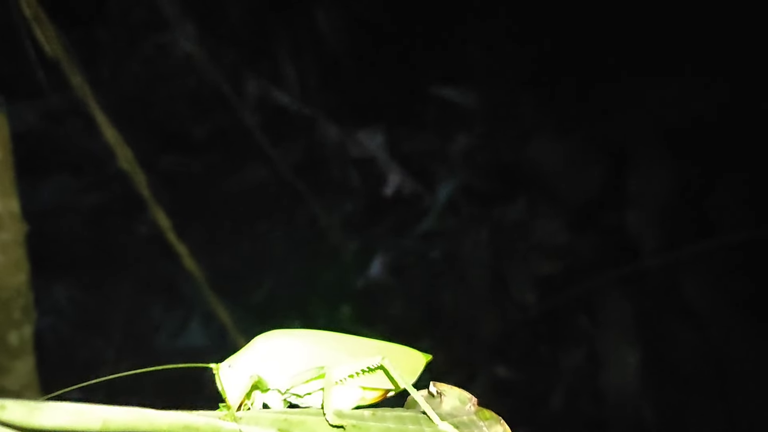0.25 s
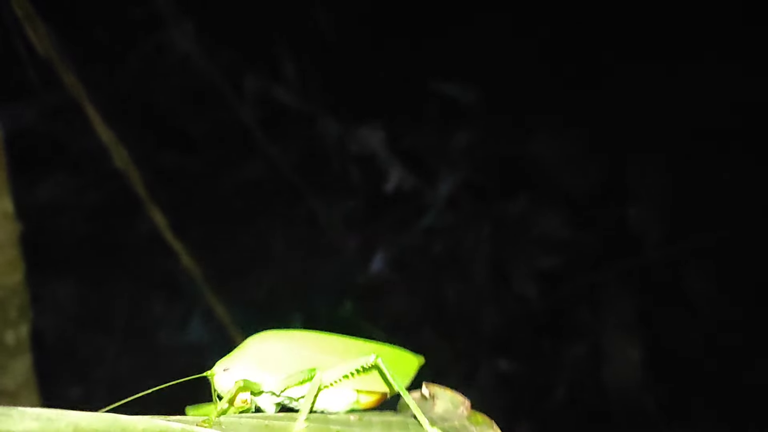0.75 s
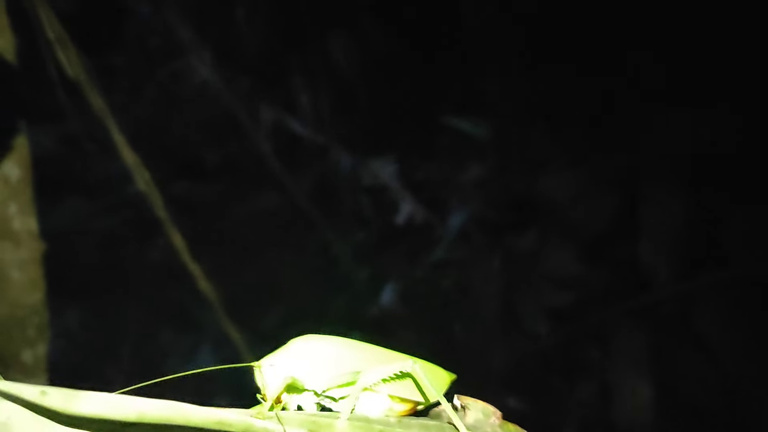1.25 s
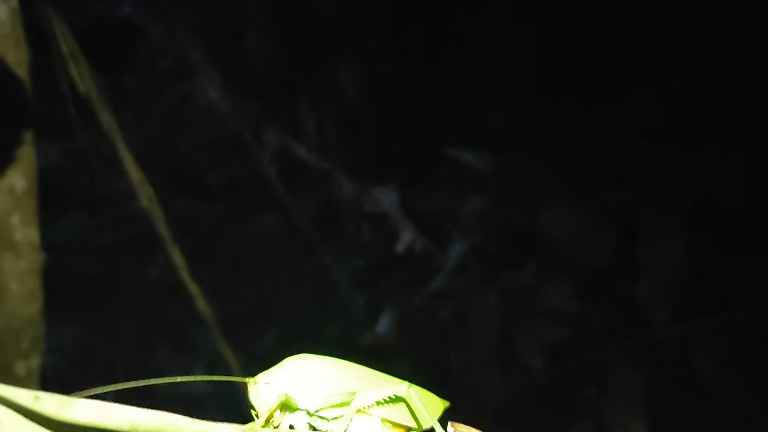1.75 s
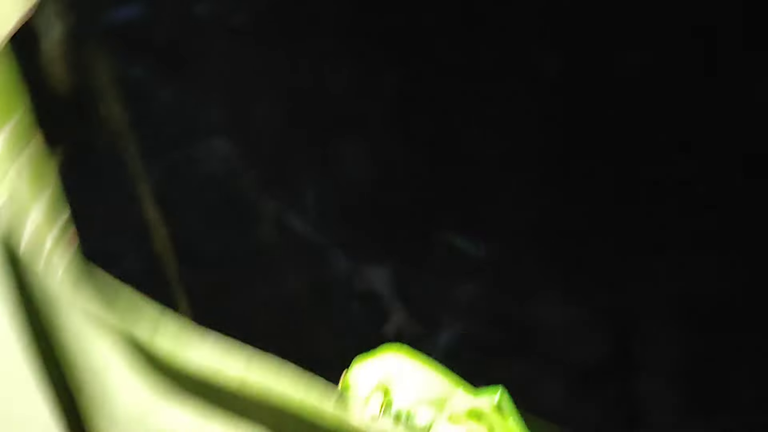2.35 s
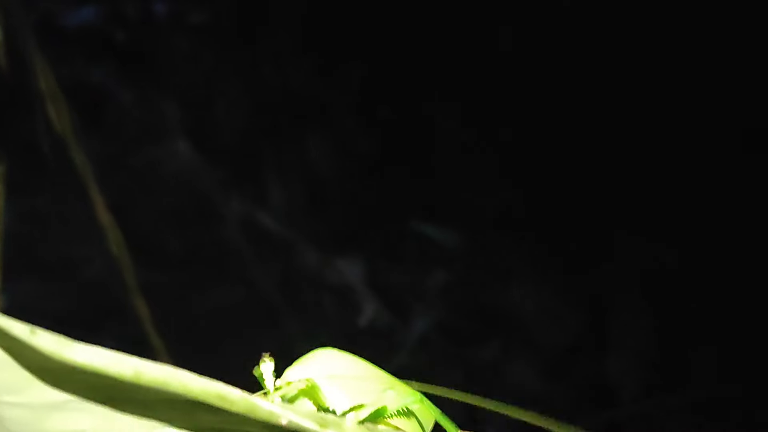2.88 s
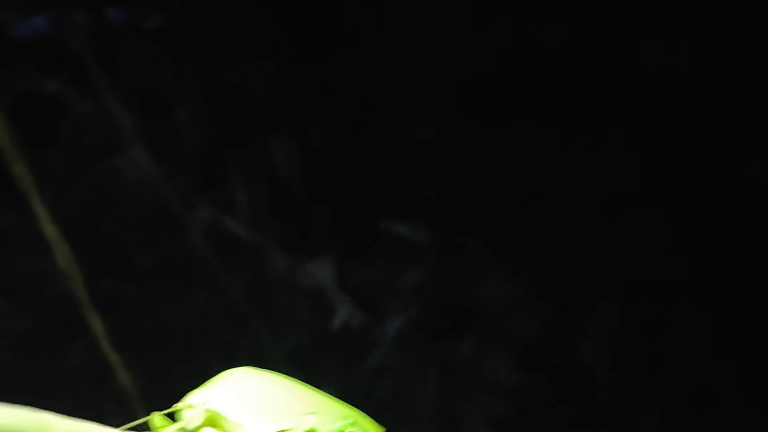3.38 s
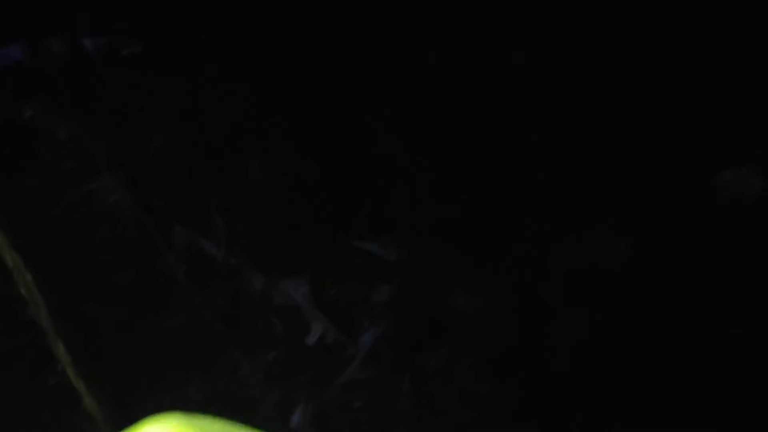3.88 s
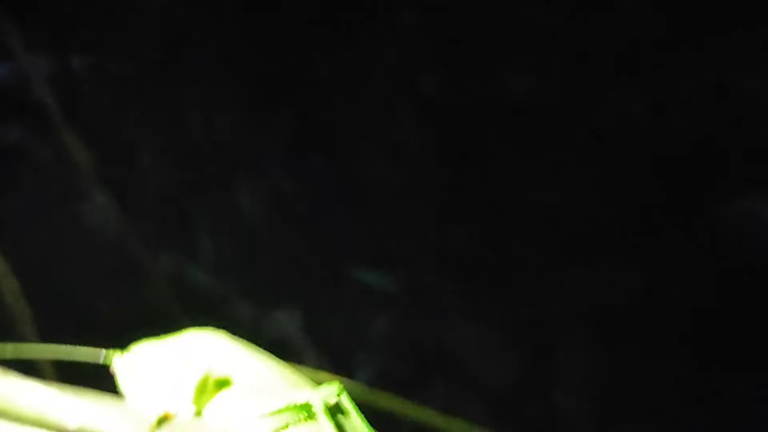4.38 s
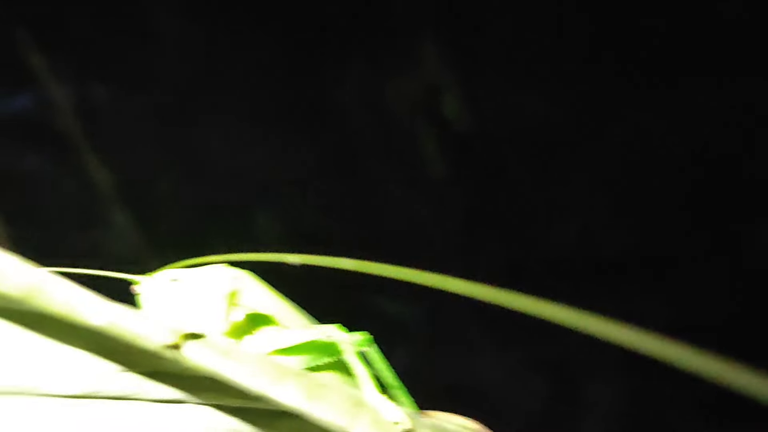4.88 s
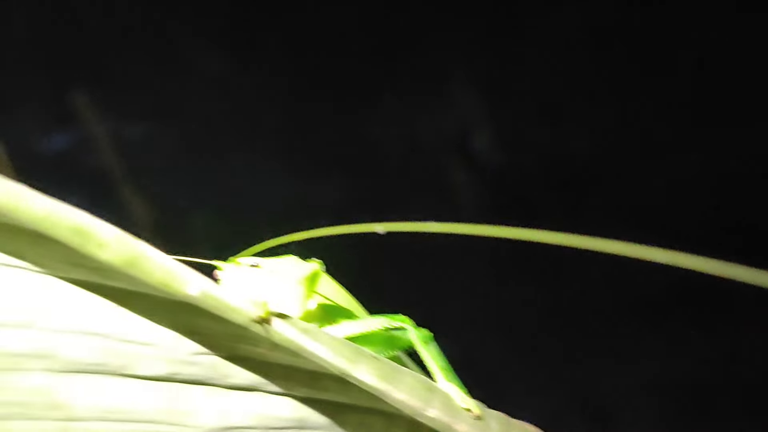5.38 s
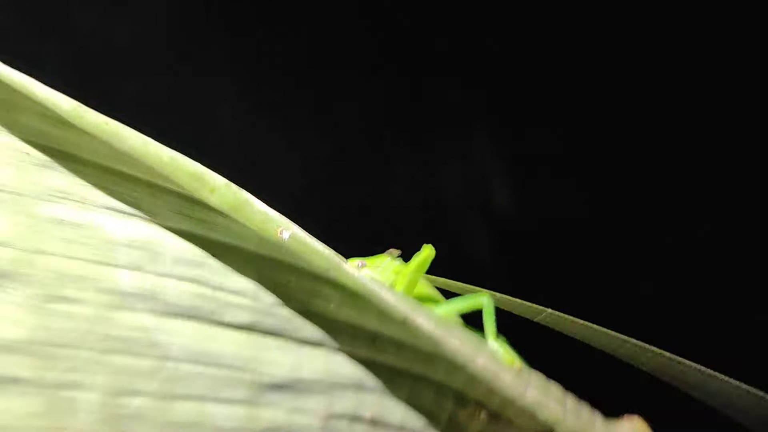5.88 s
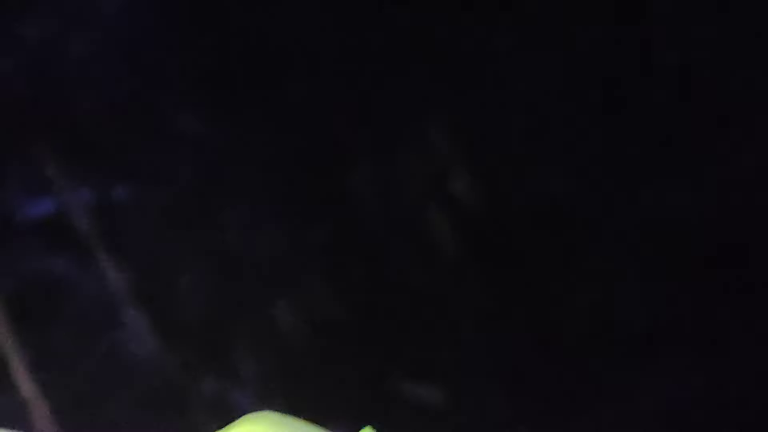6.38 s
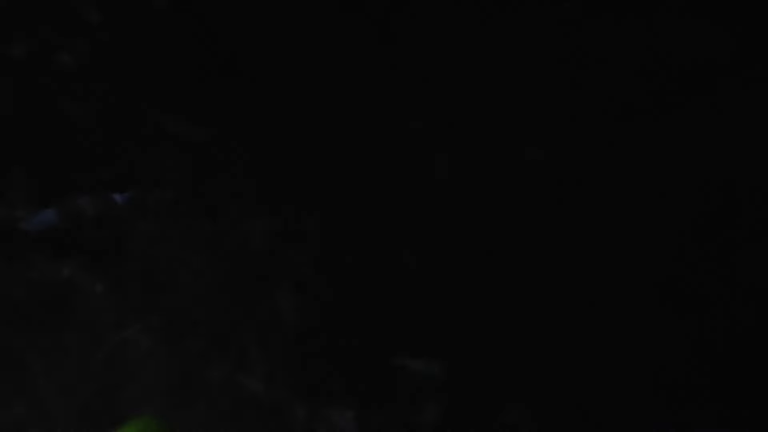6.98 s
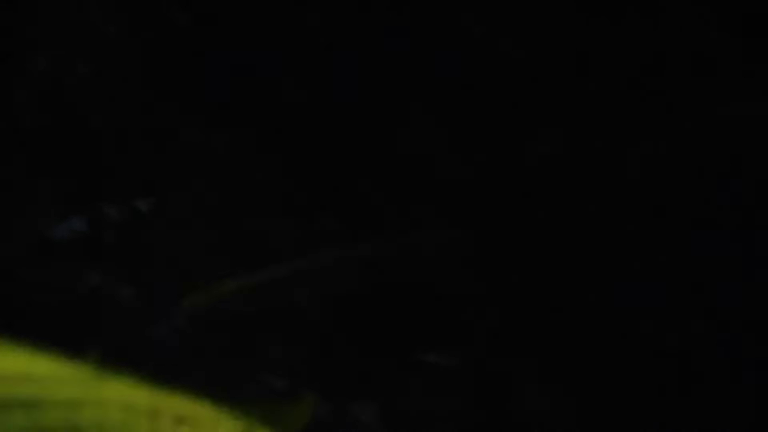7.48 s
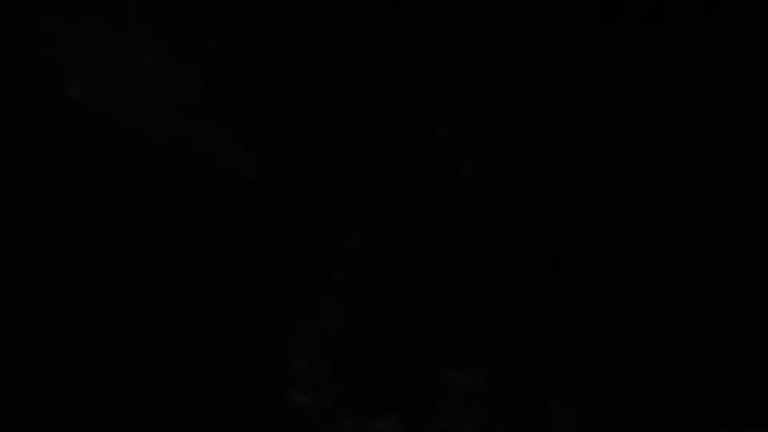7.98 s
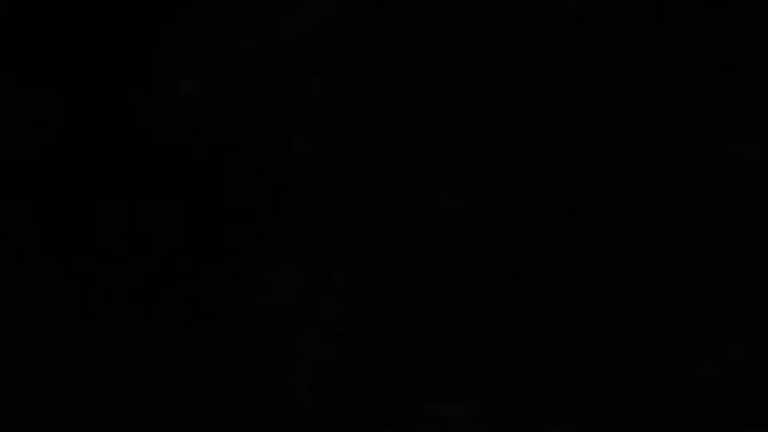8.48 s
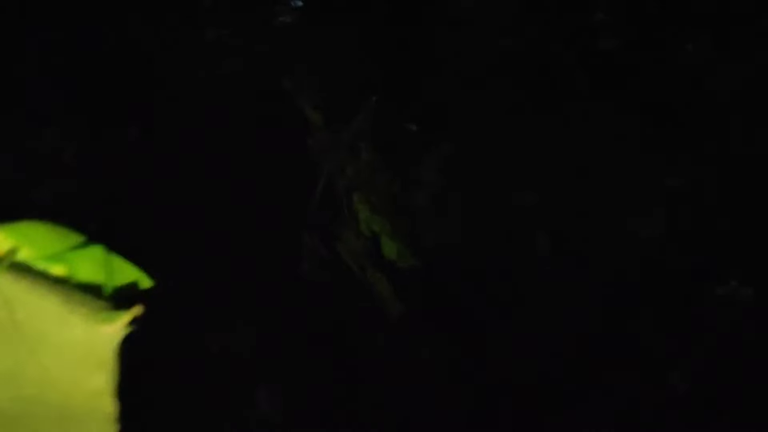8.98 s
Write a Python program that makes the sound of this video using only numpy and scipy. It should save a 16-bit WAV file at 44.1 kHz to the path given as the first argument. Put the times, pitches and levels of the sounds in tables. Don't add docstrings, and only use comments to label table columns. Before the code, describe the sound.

A night forest hisses with katydids and a cricket trills regularly, while a hand rubs and knocks the microphones and dry leaves snap.

```python
import sys
import numpy as np
from scipy import signal
from scipy.fft import rfft, irfft, next_fast_len
from scipy.io import wavfile
from scipy.ndimage import uniform_filter1d

SR = 44100
rng = np.random.default_rng(int(sys.argv[2]) if len(sys.argv) > 2 else 0)


def transcribe(u):
    v = np.clip(np.atleast_2d(u).T, -1, 1)
    q = np.round(v * 32767).astype(np.int16)
    wavfile.write(sys.argv[1], SR, q)


def boost_factor(decibels):
    exponent = np.asarray(decibels, float) / 20
    return 10 ** exponent


N = 407528
PORT_LAG_SAMPLES = 18

# freq_hz, density_db_per_hz
AIR_SPECTRUM = [(18, -40), (30, 1.5), (118, -1.5), (275, -6.5), (323, -9.5), (437, -11.5), (616, -12),
                (1020, -17.5), (1150, -19), (3700, -24.5), (4810, -69), (8140, -120)]
# freq_hz, density_db_per_hz
HISS_SPECTRUM = [(4710, -35.5), (8000, -9), (8610, -3.5), (9170, -6.5), (10200, -7.5), (10500, -6.5),
                 (12800, -5.5), (14500, -6), (15800, -9.5)]
AIR_DB, AIR_SWELL_DB, HISS_DB = -55.5, 1.2, -62.5
# freq_hz, left_minus_right_db
PORT_RESPONSE = [(60, 0), (700, 0.5), (2400, -1.5), (4400, -1), (7300, -6.5), (7800, -13), (9400, -21),
                 (10800, -9), (15000, 1)]

# first_wing_hz, last_wing_hz, wing_width_hz, level_db
SWARMS = [
    (4170, 5040, 380, -60.5),
    (6772, 7300, 160, -57.5),
    (7340, 6700, 19, -90),
    (6253, 4200, 93, -70),
]
# pitch_hz, width_hz, level_db
SINGERS = [(4380, 16, -67.5), (4490, 47, -66), (4597, 49, -62), (4920, 83, -61.5), (6710, 27, -69.5),
           (6920, 13, -68), (7230, 17, -61), (7090, 29, -60), (7870, 22, -67), (8406, 30, -73),
           (8060, 30, -78.5), (8550, 32, -76.5)]
# full_s, rise_s, hold_s, fall_s, level_db
BUZZ = [
    (2.95, 0.063, 0.56, 0.3, -53),
    (3.45, 0.54, 0.435, 0.15, -49.5),
]

# freq_hz, width_hz, gain_db
CRICKET_MODES = [(3430, 190, -1), (3190, 500, -5), (2650, 700, -26), (3690, 160, -7.5)]
# loudest_syllable_s, level_db, spacing_s, hold_s
TRILLS = [
    (0.012, -50.5, 0.062, 0.071),
    (1.73, -49, 0.058, 0.01),
    (3.429, -48.5, 0.061, 0.015),
    (5.146, -46, 0.058, 0.0047),
    (6.782, -45.5, .064, 0.055),
    (8.571, -47, 0.059, 0.07),
]
TRILL_SWELL_DB_PER_S, TRILL_FADE_DB_PER_S = 73, 184

# start_s, level_db, left_minus_right_db, body_over_tick_db
TICKS = [(0.3456, -46, -19, 8), (0.9747, -36, -21, -10), (1.044, -32, -23, -29), (1.0854, -38, -18.0, -19),
         (1.1074, -37, -19.0, -17), (1.1408, -35, -24, -17), (2.1398, -21, -40, -13),
         (2.141, -24.5, -40, -3), (2.1417, -25, -40, -8), (2.1442, -22, -40, -10), (2.1625, -39, -21, -2),
         (2.2297, -37.5, 6, 11), (2.4904, -31, 4, 9.5), (3.0716, -23.5, -22, -7), (3.376, -27, -18, -3),
         (3.7504, -26, -20, -11), (3.784, -19, -30, -0.5), (3.7853, -23, -34, -9), (3.7922, -17.5, -34, -3),
         (4.0482, -40.5, -30, 5.5), (4.065, -26.5, -35, -5), (4.4183, -24, -27, -11),
         (4.4293, -12.5, -23, -12), (4.4306, -11.5, -24, -19), (4.4317, -12, -23, -12),
         (4.432, -22, -19, -12), (4.436, -33, -23, -15), (4.4578, -18.5, -22, -9), (4.4595, -27, -20, -11),
         (4.835, -42, -23, -4), (4.9217, -48, -24.0, -14), (4.9452, -39, -24.0, -16),
         (5.7012, -30, -22, -4.5), (6.2451, -34, -17.0, -17), (7.4478, -46, 7, 14.5),
         (7.7358, -23, -5, -10), (7.7564, -33, 0, -5), (8.1715, -19, -30, -3), (8.1728, -15, -32, -4),
         (8.1795, -28, -25, -5), (8.9204, -39, -24, 3), (9.025, -34, -19, -1), (9.129, -40, -26, 9.5)]
# start_s, level_db, ring_hz, length_s, left_minus_right_db
SNAPS = [(2.283, -30.5, 1500, 0.0033, -6), (3.636, -35, 1200, 0.0041, 14), (4.429, -20, 6000, 0.0041, -8),
         (4.458, -32, 4200, 0.0033, 6), (4.615, -37, 840, .015, -8), (4.945, -35, 1500, .006, -14),
         (4.958, -33, 513, 0.008, -14), (8.17, -33, 770, 0.01, -11), (7.668, -26, 2400, 0.0078, 0),
         (7.684, -18, 2400, 0.0044, -7), (7.692, -20, 2200, 0.0094, 8), (7.686, -20, 990, 0.0061, 7),
         (7.697, -17, 930, 0.0062, 11), (7.711, -40, 2300, 0.0029, 4), (7.736, -30.5, 2100, 0.0074, -1),
         (7.757, -24.5, 5600, .005, 5)]

# full_s, rise_s, hold_s, fall_s, level_db
SWIPE = [
    (2.284, 0.002, 0.027, 0.044, -38.5),
    (2.32, 0.044, 0.041, 0.083, -33),
]
# freq_hz, width_hz, gain_db
SWIPE_BODY_MODES = [(1910, 280, -3), (2210, 120, -5), (2330, 78, 2), (2495, 92, -2), (3756, 81, 3),
                    (3870, 140, 1.5), (2790, 260, -5), (4680, 170, -10.5), (5080, 120, -10.5),
                    (5820, 93, -4.5), (6890, 80, -4.5)]
# freq_hz, width_hz, gain_db
SWIPE_TREBLE_MODES = [(9150, 200, 2), (9380, 220, 1), (9600, 500, -2), (10900, 440, -0.5),
                      (12050, 430, -2.5), (13400, 500, -13), (15030, 900, -21)]

# start_s, crack_db, thump_over_crack_db, thump_hz
KNOCKS = [(0.058, -47.5, 3.5, 192), (2.23, -29.5, 5, 148), (2.316, -30.5, -3, 92),
          (2.4902, -30.5, 9.5, 360), (2.492, -30, 11, 195), (2.499, -47, 24, 85), (2.503, -59, 14, 164),
          (2.517, -56, 16, 158), (2.868, -53.5, -3, 169), (2.915, -55, 8, 141), (2.972, -51, 9, 130),
          (3.099, -49, 5, 203), (3.147, -46, 10.5, 106), (3.179, -49, 7, 222), (6.65, -52, 11, 167),
          (6.789, -41, 5.5, 170), (7.448, -39, -6, 160), (2.543, -46, 14, 196), (2.617, -36.5, 3.5, 163),
          (2.72, -48.5, 0, 168), (2.761, -40, -2, 166), (2.932, -42, 0, 137), (3.343, -46, -2, 266),
          (3.372, -35, -1, 434), (3.402, -38, 8.5, 92.5), (3.473, -34, -2, 258), (3.535, -36.5, 1, 116),
          (3.552, -27.5, -5.5, 320), (3.626, -46.5, 16, 130), (3.634, -46, 7, 345), (3.77, -44, 4, 65),
          (4.431, -44.5, 13, 142), (4.945, -36, -5.5, 404), (5.921, -48, 0.5, 173), (6.377, -49.5, -1, 192),
          (6.812, -32.5, -4, 132), (7.42, -47, -8, 234), (7.677, -52, 2, 105), (7.778, -41, -7, 215),
          (8.151, -47, 0.5, 188), (8.781, -56.5, 9.5, 246)]
# start_s, crack_db, left_minus_right_db
TAPS = [(2.972, -53, 10), (2.995, -47, 8), (3.026, -42, 11), (3.071, -40.5, 15), (3.173, -48, 11),
        (3.656, -51, 24), (3.699, -45, -17), (3.72, -44, -30), (4.317, -52, -13), (4.457, -32, -5),
        (4.62, -45, -16), (6.964, -34, 7), (7.049, -38.5, 6), (7.148, -39.5, 8), (7.629, -55, 12),
        (7.669, -36, 15), (7.733, -37, 6), (7.806, -50, -7), (7.985, -42.5, 3.5), (8.03, -46, 6),
        (8.0663, -35, 11), (8.108, -54, 0), (8.391, -54, -10), (7.901, -63, 3), (6.621, -60, 4),
        (6.64, -58, -5), (6.675, -55, 10), (8.329, -48, 26)]

# time_s, palm_left_minus_right_db, fingertips_left_minus_right_db
HAND_PLACE = [(0.07, -9, -0.5), (2.16, -21, -11), (2.21, 11, 9), (2.34, 11, -1), (2.6, 12.5, 5),
              (2.9, 16, 6.5), (3.12, 5, 7), (3.3, 15, 11), (3.56, 16, -4), (3.75, 12, -8.5), (4.0, 2, 6.5),
              (4.35, -20, -13.5), (4.6, -1, -1), (4.96, -8.5, -15), (5.9, 5, 10), (6.8, 7.5, 2.5),
              (7.8, 5.5, 4), (9.2, -2, 6)]
# full_s, rise_s, hold_s, fall_s, rumble_db
GRIPS = [(0.07, 0.087, .005, 0.14, -52.5), (2.14, 0.004, 0.0055, 0.04, -39),
         (2.245, 0.0091, 0.04, 0.14, -38), (2.505, 0.017, 0.048, 0.046, -32.5),
         (2.612, 0.012, .01, 0.44, -44.5), (2.868, .005, 0.38, 0.022, -44.5),
         (3.35, 0.013, 0.009, 0.15, -38), (3.55, .015, .01, 0.37, -43.5), (3.76, 0.041, 0.011, 0.3, -44.5),
         (4.063, 0.43, 0.0092, 0.12, -54.5), (4.426, 0.36, 0.0056, 0.18, -39.5),
         (4.56, .05, 0.1, 0.054, -61.5), (4.964, 0.36, .005, 0.089, -49), (6.644, 0.021, .005, 0.23, -46.5),
         (6.81, 0.17, .005, 0.34, -40.5), (6.9, 0.11, 0.06, 1, -48), (7.35, 0.37, 0.29, 0.038, -56),
         (7.68, 0.018, 0.0045, 0.055, -31.5), (7.76, .03, 0.029, 0.017, -47.5),
         (8.18, 0.32, .005, 0.061, -54.5), (9.2, 0.17, 0.035, .03, -61.5)]
# full_s, rise_s, fall_s, scrape_db, rustle_over_scrape_db
STROKES = [(0.0, .01, 0.17, -59.5, -9), (2.14, 0.004, 0.013, -43.5, -11), (2.195, 0.013, 0.068, -52.5, -7),
           (2.554, 0.022, 0.016, -48.5, -7), (2.764, 0.0059, 0.051, -53.5, -6),
           (2.9, .03, 0.066, -55.5, -14), (2.31, 0.037, 0.17, -43, 5.5), (2.615, .01, 1, -61.5, -5),
           (3.082, 0.31, 0.25, -52, -1), (3.19, 0.073, 0.045, -52.5, -5), (3.375, 0.05, 0.081, -43.5, 1.5),
           (3.54, .01, 0.63, -59, 6), (3.775, 0.023, 0.16, -46.5, 1), (4.063, 1, 0.13, -53.5, 1),
           (4.34, 0.38, 0.18, -43.5, 4), (4.42, 0.22, 0.011, -44.5, 6), (4.462, 0.066, 0.11, -43, -0.5),
           (4.58, 0.062, 0.24, -53, -2), (4.845, 0.03, 0.16, -54.5, 10.5), (4.96, 0.23, 0.075, -46, 4.5),
           (6.672, 0.058, 0.53, -42.5, -1.5), (6.88, 0.55, 0.99, -43.5, -8), (7.25, 1, 0.56, -51.5, -3),
           (7.641, 0.21, 0.2, -39.5, 0), (7.67, 0.028, 0.014, -33.5, -0.5),
           (7.688, 0.005, 0.037, -30, -5.5), (7.738, 0.091, 0.042, -45.5, 6.5),
           (8.18, 0.73, 0.22, -59.5, 2.5), (8.93, 0.24, 0.097, -59, 1.5), (9.2, 0.23, 0.033, -58.5, 0)]
# freq_hz, density_db_per_hz
RUB_SPECTRA = [
    [(25, 6), (60, -4), (110, 0.5), (200, -1), (400, -8), (1000, -23.5), (2000, -37)],
    [(250, -10), (500, -3), (900, -2), (1300, 0.5), (2300, -4.5), (3000, -10), (3800, -1), (5000, -16),
     (5700, -9), (6800, -12.5), (8000, -27)],
    [(7900, -12.5), (8600, -8.5), (9400, 0.5), (10300, -3.5), (11500, -4), (13000, -9), (15500, -12),
     (16500, -42)],
]
# time_s, share_0_to_1
SCRAPE_SHARE = [(0, .9), (6.8, .9), (6.92, .995), (7.6, .995), (7.67, .9), (7.72, .99), (7.85, .9)]
STROKE_HOLD_S, RAMP_BEND = 0.0087, 2.17

# freq_hz, level_under_neighbours_db
DROPOUT = [(2000, -20), (2500, -14), (3100, -12.5), (3550, -12), (3800, -5), (4200, -14), (5000, -14),
           (5300, 1), (6400, -1), (6700, -13), (7400, -9), (7760, -14), (7900, 3), (8250, 1), (8400, -8),
           (10500, -1), (12500, 1.5), (14500, 1), (16000, -1.5)]
# freq_hz, sum_under_difference_db
MASKED_SUM = [(1200, -11.5), (3000, -7)]


def level(x, db):
    return x * boost_factor(db) / np.sqrt(np.mean(x ** 2))


def colour(x, table):
    hz, db = np.transpose(table)
    size = next_fast_len(x.shape[-1])
    log_hz = np.log(np.fft.rfftfreq(size, 1 / SR) + 1)
    gain = boost_factor(np.interp(log_hz, np.log(hz), db))
    return irfft(rfft(x, size) * gain, size)[..., :x.shape[-1]]


def ring(x, hz, width_hz):
    return signal.lfilter(*signal.iirpeak(hz, hz / width_hz, fs=SR), x)


def ring_modes(x, modes):
    return sum(boost_factor(db) * ring(ring(x, hz, width_hz), hz, 2 * width_hz) for hz, width_hz, db in modes)


def walk(rate_hz, channels=1):
    count = int(N / SR * rate_hz) + 2
    at = np.linspace(0, count - 1, N)
    return np.array([np.interp(at, np.arange(count), row) for row in rng.standard_normal((channels, count))])


def add(out, sound, start_s, pan_db):
    for side, (lag, sign) in enumerate([(0, 1), (PORT_LAG_SAMPLES, -1)]):
        start = max(int(start_s * SR) + lag, 0)
        piece = sound[side % len(sound), :N - start]
        out[side, start:start + len(piece)] += piece * boost_factor(sign * pan_db / 2 - abs(pan_db) / 2)


def swells(rows):
    t, power = np.arange(0, N / SR + .01, .001), 0
    for full_s, rise_s, hold_s, fall_s, db in rows:
        rise = 1 + (t - full_s) / abs(rise_s)
        fall = 1 - (t - full_s - abs(hold_s)) / abs(fall_s)
        ramp = np.clip(np.minimum(rise, fall), 0, 1)
        power = power + (boost_factor(db) * ramp ** RAMP_BEND) ** 2
    return np.interp(np.arange(N) / SR, t, np.sqrt(power))


def pair(shared, grit):
    same, left, right = rng.standard_normal((3, N)) * grit
    share = np.clip(shared, 0, 1)
    common = np.array([same, np.roll(same, PORT_LAG_SAMPLES)])
    return np.sqrt(share) * common + np.sqrt(1 - share) * np.array([left, right])


def sides(pan_db):
    return boost_factor(np.array([pan_db, -pan_db]) / 2 - np.abs(pan_db) / 2 + 5.0)


def place(time_s, axis):
    table = np.array(HAND_PLACE)
    return np.interp(time_s, table[:, 0], table[:, axis])


def slips(rate_hz, fade_s):
    chance = rng.random((2, N))
    kicks = (chance[0] < rate_hz / SR) * -np.log(chance[1] + 1e-9)
    return signal.lfilter([1], [1, -np.exp(-1 / (fade_s * SR))], kicks)


def night():
    noise = rng.standard_normal((5, N))
    air = level(colour(noise[:2] + .5 * noise[2], AIR_SPECTRUM), AIR_DB)
    hiss = level(colour(noise[3:], HISS_SPECTRUM), HISS_DB)
    return air * boost_factor(AIR_SWELL_DB * walk(2.5)) + hiss


def chorus():
    out, blur = np.zeros((2, N)), rng.standard_normal((2, N))
    for first_hz, last_hz, width_hz, db in SWARMS:
        swarm = 0
        for hz in np.linspace(first_hz, last_hz, num=4):
            strikes = np.roll(blur, rng.integers(N), axis=1) * boost_factor(2 * walk(14.))
            swarm = swarm + ring(ring(strikes, hz, width_hz), hz, 0.95 * width_hz)
        out += level(swarm, db)
    for hz, width_hz, db in SINGERS:
        swell = boost_factor(2 * walk(5.))
        strikes = np.roll(blur, rng.integers(N), axis=1)
        out += level(ring(strikes, hz, width_hz), db) * swell
    return colour(out, [(3300, 4.0), (3900, 2.5), (5120, 0.5), (5300, -74), (5800, 9.0), (6550, 2),
                        (7900, -5.0), (9000, 1.5)])


def syllables():
    rows = []
    for peak_s, db, spacing_s, hold_s in TRILLS:
        since_s = spacing_s * np.arange(-3, 5)
        swell_db = -since_s * TRILL_SWELL_DB_PER_S
        fade_db = np.maximum(since_s - hold_s, 0) * TRILL_FADE_DB_PER_S
        loss_db = np.maximum(swell_db, fade_db)
        rows += [(peak_s + a, db - loss) for a, loss in zip(since_s, loss_db) if peak_s + a > 0]
    return rows


def cricket():
    out = np.zeros((2, N))
    t = np.arange(int(.09 * SR)) / SR
    envelope = np.exp(-(np.abs(t - .03) / np.where(t < .03, .004, .032)) ** 3)
    strokes = envelope * (0.31 + np.cos(np.pi * 112 * (t - .033)) ** 2)
    for peak_s, db in syllables():
        waver = np.cumsum(0.042 * rng.standard_normal((2, len(t))), axis=1)
        phase = waver + 2 * np.pi * rng.random((2, 1))
        tone = np.sin(2 * np.pi * CRICKET_MODES[0][0] * t + phase)
        teeth = (rng.standard_normal((2, len(t))) + 0.12 * tone) * strokes
        sharp = 1 + 0.00072 * (db + 49)
        contrast = 2.0 + np.clip((-39.0 - db) / 20, -.4, 1)
        wing = ring_modes(teeth, [(sharp * hz, width_hz / 1, contrast * g) for hz, width_hz, g in CRICKET_MODES])
        add(out, level(wing, db - 1.0), peak_s - .045, -1.5)
    tail_t = np.arange(int(.3 * SR)) / SR
    tail = rng.standard_normal((2, len(tail_t))) * boost_factor(-60 * tail_t / 0.54)
    return out + boost_factor(-32.5) * signal.fftconvolve(out, tail, axes=1)[:, :N]


def near_katydid():
    buzz = colour(rng.standard_normal((2, N)), [(10000, -21.5), (13200, -8), (15000, -4.0), (16500, -9.5)])
    first_s, period_s, throb_depth_db = 2.952, 0.14, 1
    throb_db = throb_depth_db * np.cos(2 * np.pi * (np.arange(N) / SR - first_s) / period_s)
    return level(buzz, 4.6) * swells(BUZZ) * boost_factor(throb_db + 2.5 * walk(60.))


def ticks():
    out = np.zeros((2, N))
    t = np.arange(int(.04 * SR)) / SR
    decay = np.exp(-(t / 0.00127) ** 2) + boost_factor(-6.5) * np.exp(-t / 0.0035)
    for start_s, db, pan_db, body_db in TICKS:
        burst = rng.standard_normal(len(t)) * np.minimum(t / 0.0004, 1) * decay
        port = ring(burst, 9530.0, 740.0)
        port = port + 0.28 * ring(burst, 10000.0, 4200.0) + 0.1 * ring(burst, 15500.0, 2500.0)
        body = ring(ring(burst, 3650.0, 6700.0), 4600.0, 4800.0)
        add(out, boost_factor(db + 1.0) * port[None] / np.abs(port).max(), start_s, pan_db)
        add(out, boost_factor(db + body_db - 1.0) * body[None] / np.abs(body).max(), start_s, pan_db / 3)
    return out


def snaps():
    out = np.zeros((2, N))
    t = np.arange(int(.04 * SR)) / SR
    for start_s, db, hz, length_s, pan_db in SNAPS:
        burst = rng.standard_normal(len(t)) * np.minimum(t / 0.00077, 1) * np.exp(-(t / length_s) ** 2)
        sound = ring_modes(burst, [(hz, 0.26 * hz, 0)])
        add(out, boost_factor(db) * sound[None] / np.abs(sound).max(), start_s, pan_db)
    return out


def swipe():
    body_lag_s, body_db = 0.008, -4.5
    gain = swells(SWIPE)
    body_gain = np.roll(gain, int(body_lag_s * SR)) * boost_factor(body_db)
    stroke = pair(0.063, boost_factor(1.9 * walk(250.)))
    treble = level(ring_modes(stroke, SWIPE_TREBLE_MODES), 0) * gain
    body = level(ring_modes(stroke, SWIPE_BODY_MODES), 0) * body_gain
    return treble * sides(-24.0)[:, None] + body * sides(-6.0)[:, None]


def knocks():
    out = np.zeros((2, N))
    t = np.arange(int(.15 * SR)) / SR
    dent = -np.sin(2 * np.pi * 750 * t) * boost_factor(-60 * t / 0.0033)
    blows = [(start_s, db, 1.34 * place(start_s, axis=1), thump_db, hz) for start_s, db, thump_db, hz in KNOCKS]
    blows += [(*tap, -29, 205) for tap in TAPS]  # thump_db, thump_hz
    for start_s, db, pan_db, thump_db, hz in blows:
        thump = -np.sin(2 * np.pi * hz * t) * boost_factor(-60 * t / 0.077)
        thump -= 1.94 * np.sin(2 * np.pi * 2.34 * hz * t) * boost_factor(-60 * t / 0.0077)
        burst = rng.standard_normal(len(t)) * boost_factor(-60 * t / 0.037)
        crack = ring(ring(burst, 540.0, 750.0), 750.0, 1300.0)
        sound = boost_factor(thump_db) * thump + 1.83 * dent + 1.27 * crack / np.abs(crack).max()
        add(out, boost_factor(db + 5.5) * sound[None], start_s + 0.0011, pan_db)
    return out


def hand():
    t = np.arange(N) / SR
    scrape = [(s, rise_s, STROKE_HOLD_S, fall_s, db) for s, rise_s, fall_s, db, _ in STROKES]
    rustle = [(s, rise_s, STROKE_HOLD_S, fall_s, db + over_db) for s, rise_s, fall_s, db, over_db in STROKES]
    palm_pan_db, tip_pan_db = place(t, axis=1), place(t, axis=2)
    scrape_share = np.interp(t, *np.transpose(SCRAPE_SHARE))
    jerks, crackle = slips(34.0, 0.013), slips(160., 0.0011)
    # movements, spectrum, pan_db, shared, jerk, crack
    layers = [(GRIPS, RUB_SPECTRA[0], palm_pan_db, 0.62, 0.6, .1),
              (scrape, RUB_SPECTRA[1], tip_pan_db, scrape_share, 0.15, 0.6),
              (rustle, RUB_SPECTRA[2], tip_pan_db - 22.0, 0.23, 0.12, 0.7)]
    out = np.zeros((2, N))
    for moves, spectrum, pan_db, shared, jerk, crack in layers:
        skin = colour(pair(shared, 1 + jerk * jerks + crack * crackle), spectrum)
        out += level(skin, 0) * swells(moves) * sides(pan_db)
    return out


def scene():
    far = night() + chorus()
    far = np.array([colour(far[side], [(hz, sign * db / 2) for hz, db in PORT_RESPONSE])
                    for side, sign in enumerate([1, -1])])
    return far + cricket() + near_katydid() + ticks() + snaps() + swipe() + knocks() + hand()


def drop_hidden_bands(x):
    frame = dict(window="cosine", nperseg=2048, noverlap=1024)
    hz, _, z = signal.stft(x, SR, **frame)
    power = np.abs(z[:, :1024]) ** 2
    band, band_hz = power.reshape(2, -1, 8, power.shape[-1]).mean(axis=2), hz[:1024:8]
    near = uniform_filter1d(band, size=24, axis=1)
    luck_db = 4 * np.repeat(rng.standard_normal((2, band.shape[1], band.shape[2] // 2 + 1)), 2, axis=2)
    edge_db = np.interp(band_hz, *np.transpose(DROPOUT))[:, None] + luck_db[..., :band.shape[2]]
    top_hz = 15900
    keep = (band > near * boost_factor(2 * edge_db)) & (band_hz < top_hz)[:, None]

    treble = np.pad(np.diff(x, n=2), ((0, 0), (512, 2048)))
    treble = treble[:, :keep.shape[2] * 1024].reshape(2, -1, 1024)
    click = np.abs(treble).max(axis=2) > np.maximum(7 * treble.std(axis=2), .09)
    near_click = uniform_filter1d(1. * click, size=3, axis=1) > 0
    keep |= near_click[:, None] & (band_hz < top_hz + 900)[:, None]
    z = z * np.pad(np.repeat(keep, 8, axis=1), ((0, 0), (0, 1), (0, 0)))

    mid, side = (np.abs(z[0, :1024] + sign * z[1, :1024]) ** 2 for sign in (1, -1))
    mid, side = (p.reshape(-1, 4, p.shape[-1]).mean(axis=1) for p in (mid, side))
    masked_db = np.interp(hz[:1024:4], *np.transpose(MASKED_SUM))[:, None]
    lost = np.pad(np.repeat(mid < side * boost_factor(2 * masked_db), 4, axis=0), ((0, 1), (0, 0)))
    lost[hz > 6500] = False
    z = z - lost * z.mean(axis=0)
    return signal.istft(z, SR, **frame)[1][:, :N]


def roll_off(x):
    return signal.sosfilt(signal.butter(12, 16990, fs=SR, output="sos"), x)


def record(dry):
    highpass = signal.butter(N=2, Wn=48., btype="high", fs=SR, output="sos")
    mix = drop_hidden_bands(signal.sosfilt(highpass, dry))
    return roll_off(mix)


dry = scene()
out = record(dry)
transcribe(out)
```